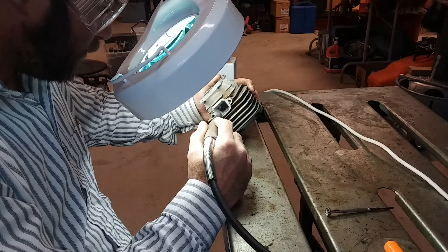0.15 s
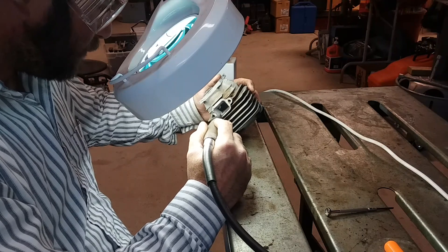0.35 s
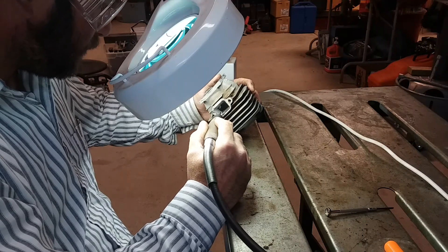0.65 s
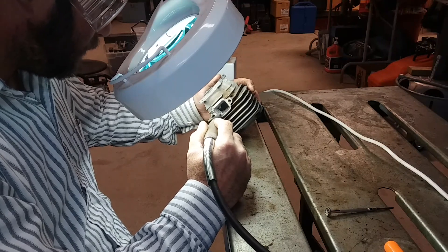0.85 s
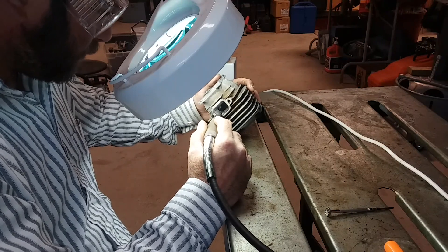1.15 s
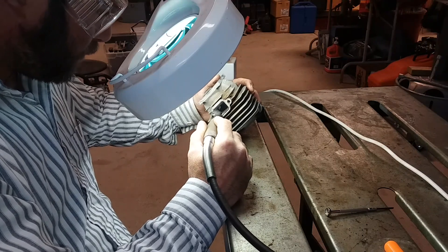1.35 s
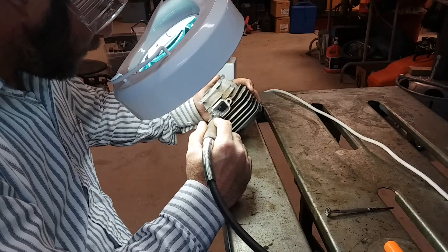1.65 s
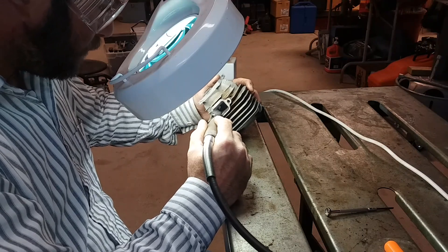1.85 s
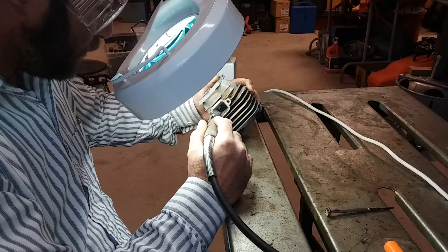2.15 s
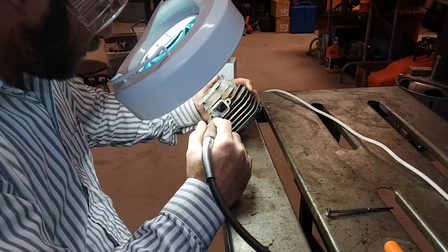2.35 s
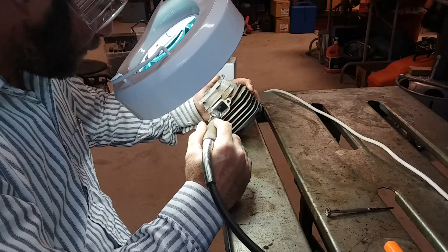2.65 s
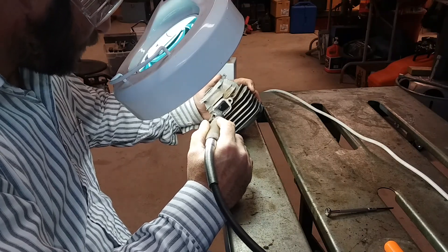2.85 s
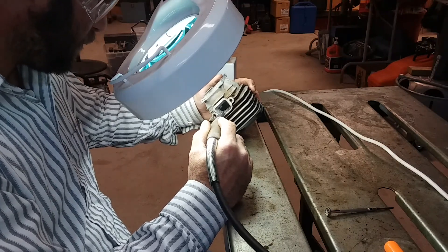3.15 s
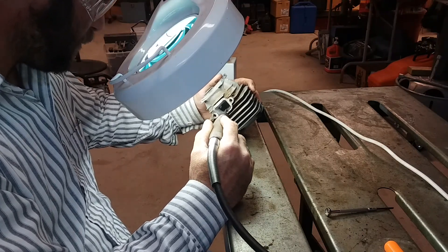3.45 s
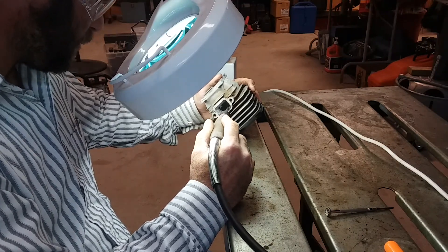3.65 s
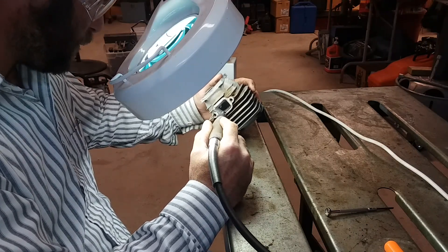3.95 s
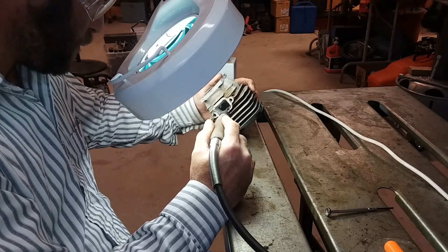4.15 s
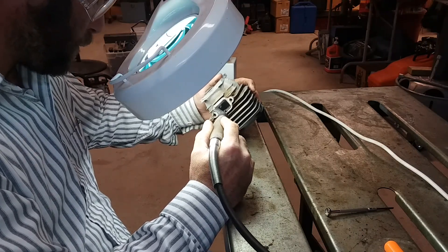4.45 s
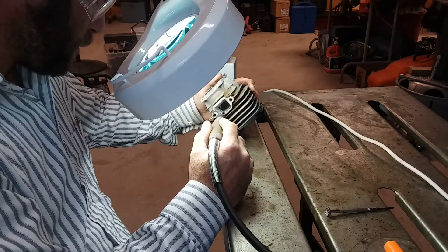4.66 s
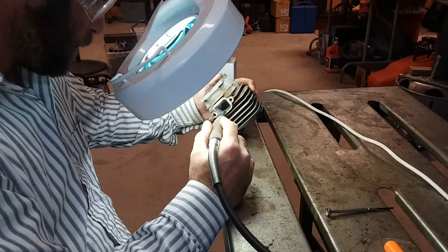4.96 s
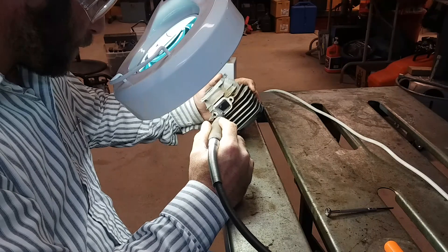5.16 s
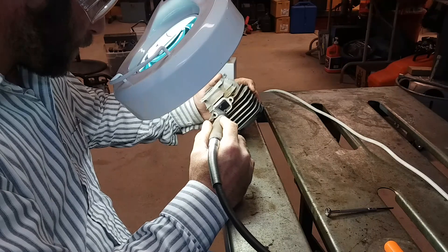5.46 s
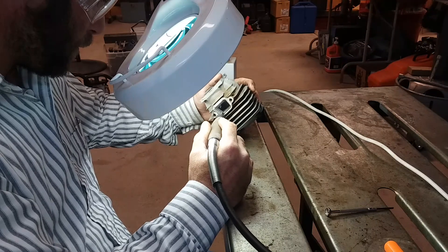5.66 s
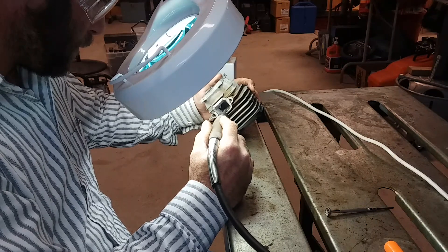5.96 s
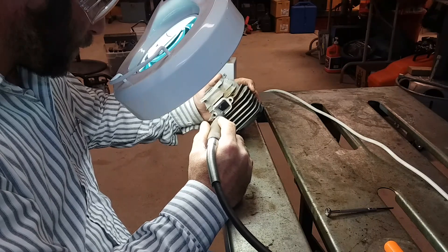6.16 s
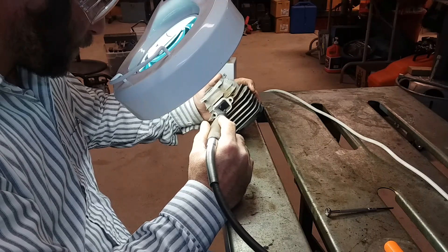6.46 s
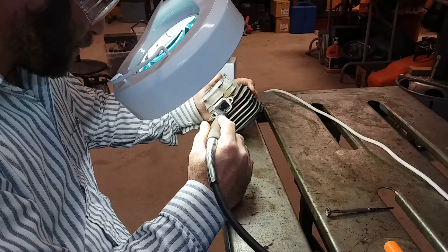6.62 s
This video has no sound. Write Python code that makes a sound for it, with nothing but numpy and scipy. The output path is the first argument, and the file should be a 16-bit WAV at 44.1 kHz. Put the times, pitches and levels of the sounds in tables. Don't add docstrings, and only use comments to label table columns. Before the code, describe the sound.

A rotary burr buzzes steadily against metal, its fast knocks merging into a coarse drone topped with sizzling hiss. Two short lifts and one longer lift thin the sound to airy motor whine; skittering taps mark the second and third returns. Then grinding resumes brighter, with wavering metallic ringing until the end. Heard close at a bench in a slightly live shop, in stereo.

```python
import sys
import numpy as np
from scipy import signal
from scipy.fft import rfft, irfft, next_fast_len
from scipy.io import wavfile
from scipy.ndimage import uniform_filter1d, map_coordinates

SR = 44100
rng = np.random.default_rng(int(sys.argv[2]) if len(sys.argv) > 2 else 0)


def materialize(psi):
    bounded = np.clip(np.atleast_2d(psi).T, -1, 1)
    quanta = np.round(bounded * 32767).astype(np.int16)
    wavfile.write(sys.argv[1], SR, quanta)


def invert_db(x):
    u = np.asarray(x, float) / 20
    return 10 ** u


N = 299439

# start_s, turns_per_s
SHAFT_SPEED = [(0, 168.5), (.3, 168.0), (.5, 169.0), (.75, 170.4), (1.0, 169.8), (1.35, 168.0),
               (1.55, 168.4), (1.75, 169.9), (2.0, 170.1), (2.3, 168.2), (2.55, 168.4), (2.8, 170.0),
               (3.3, 170.1), (3.7, 167.2), (3.95, 169.0), (4.3, 168.2), (6.79, 168.2)]
# start_s, end_s
LIFTS = [
    (.535, 0.86),
    (1.645, 1.974),
    (2.635, 3.245),
]
# start_s, knock_db, hiss_db, once_a_turn_shake_db, twice_a_turn_shake_db
HOLDS = [
    (0, -30, -42.5, -47, -52),
    (.29, -35.5, -42.5, -48.5, -60.5),
    (.7, -31, -44.5, -48.5, -67),
    (1.12, -33, -44.5, -47.5, -50),
    (1.8, -32.5, -43, -47, -53),
    (3.0, -41.5, -43, -49, -57),
    (3.64, -38.5, -40, -57.5, -62),
    (4.1, -37.5, -39, -49, -58),
    (4.95, -35, -38.5, -47.5, -57.5),
    (5.9, -34.5, -40, -46.5, -55),
]
# start_s, length_s, knock_gain_db, hiss_gain_db
DIGS = [(.1, 0.043, 0.5, 4), (.21, 0.078, -2, 3.5), (.45, 0.16, 5, 7), (.98, 0.16, -0.5, 3.5),
        (1.39, 0.11, 2, 3.5), (1.45, 0.076, 2, 5.5), (1.55, 0.051, 0, 5), (2.09, 0.04, 2.5, 8),
        (2.29, .06, 8, 6), (2.46, 0.058, 1, 4.5), (3.33, .08, 5, 4.5), (3.5, 0.099, 3.5, 3.5),
        (3.66, 0.045, -1.5, 1.5), (3.85, 0.061, 3.5, 1.5), (4.16, 0.16, 4, 0), (4.36, 0.13, 7, -0.5),
        (4.51, 0.047, 8.5, 2.5), (4.61, 0.028, 6, 5.5), (4.69, .1, 4, 2), (4.91, .09, 8, 1.5),
        (5.23, 0.18, 4, 2.5), (5.49, 0.15, 3.5, 1.5), (5.84, 0.028, 7, 2.5), (5.91, 0.043, 4.5, 1),
        (6.11, 0.033, 4, -0.5), (6.2, 0.12, 2, 1), (6.33, 0.087, 1.5, 2.5), (6.5, 0.038, 1, 4),
        (6.58, 0.066, 0.5, 5.5), (6.76, 0.049, 7, 3.5)]
# start_s, peak_db
TOUCHDOWNS = [(1.9522, -21.5), (1.9686, -20.5), (1.9817, -31), (1.9935, -35), (2.004, -32), (2.0158, -21),
              (2.028, -26), (2.0457, -26), (2.0573, -18), (3.203, -22.5), (3.2162, -29), (3.2513, -24),
              (3.264, -28), (3.275, -25), (3.28, -26), (3.2935, -33)]
# pitch_hz, width_hz, level_db
PORT_FIRST = [(1657, 166, 4.5), (1920, 980, -2), (2573, 140, 0), (3565, 380, -5.5)]
PORT_SECOND = [(1688, 230, -1), (2155, 710, -3), (2608, 340, -4.5), (3530, 206, -9)]
# pitch_hz, level_db (per Hz)
RASP = [(60, -52), (120, -16), (200, -21), (221, -8.5), (329, -8), (385, -13.5), (904, -19), (1430, -3),
        (1870, -7.5), (2860, -8), (4260, -2.5), (6000, -6), (7800, -43), (13200, -120)]
# pitch_hz, width_hz, level_db (over the rasp)
FINS_FIRST = [(1937, 16, 20), (2692, 30, 12), (3610, 150, 2), (4383, 14, 9), (4720, 110, 0)]
FINS_SECOND = [(1640, 22, 12), (2468, 30, 6), (2690, 25, 4), (3433, 90, -2), (3600, 25, 6), (3710, 25, 4),
               (3842, 16, 8), (4312, 16, 1)]
# pitch_hz, level_db (per Hz)
HISS_FIRST = [(1000, -55), (3240, -5), (5500, -4.5), (5820, -8), (7320, -2), (9600, -11.5), (13100, -2),
              (15700, -12.5)]
HISS_SECOND = [(1000, -50), (3240, -21), (5500, -17), (6190, -7), (7220, -3.5), (7750, -4), (8870, -9),
               (10000, -7), (10400, -9.5), (11600, -7), (13800, 0), (15700, -7)]
# pitch_hz, width_hz, level_db
WALLS_FIRST = [(7080, 60, 2), (7350, 100, 5), (8060, 80, 2), (11850, 140, 4), (13550, 100, 3),
               (15130, 60, 6)]
WALLS_SECOND = [(7050, 70, 4), (7350, 80, 10), (8075, 60, 2), (8580, 50, 10), (9050, 80, 8),
                (10490, 40, 10), (12320, 50, 4), (13360, 40, 8), (14090, 120, 4), (14357, 35, 8),
                (15140, 90, 13), (15353, 40, 6), (15680, 60, 3)]
# pitch_hz, width_hz, level_db (of the cancelling wave)
NULLS = [(5900, 250, -6), (6350, 150, -6), (8440, 120, -3), (9160, 150, -3), (9900, 500, -6),
         (10350, 150, -4), (14780, 350, -4)]
# pitch_hz, left_right_likeness (0 to 1)
DIRECT = [(150, 0.99), (500, 0.84), (1000, 0.34), (1800, 0.99), (2800, 0.63), (6000, 0.66), (15000, 0.67)]
# pitch_hz, level_db
LEAN = [(60, 9), (150, -1), (380, 0.5), (950, 10), (2380, 0.5), (5980, 2.5), (15000, 3)]
# pitch_hz, t60_s
SHOP_DECAY = [(200, 0.95), (2000, 0.25), (12000, 0.058)]
# start_s, level_db
HUM = [(0, -56), (1.55, -56.5), (2.55, -60), (2.8, -63.5), (4.2, -64.5), (6.79, -69)]
# pitch_hz, level_db (per Hz)
BOARDS = [(120, -49), (230, -1), (330, -9), (450, 5.5), (800, -13), (1300, -30), (3000, -80)]
# pitch_hz, level_db (per Hz)
MOTOR_RUSH = [(30, -28), (65, -16), (105, -11), (165, -23), (250, -17), (500, -11), (1150, -4), (1450, -9),
              (2200, -8), (3200, -11), (5500, -16), (8100, -17), (8500, -22), (10500, -21), (13500, -18),
              (15800, -17)]
# pitch_hz, width_hz, level_db (over the rush)
HOUSING = [(1660, 290, -4), (2600, 500, -3), (12000, 1050, -2.5)]
# pitch_hz, left_right_likeness (0 to 1)
FAR = [(150, 0.84), (500, 0.67), (1000, 0.054), (2000, 0.33), (15000, 0.56)]
# multiple_of_shaft_speed, level_db
SHAFT_TONES = [(10, -60), (14, -63), (16, -55.5), (18, -53), (22, -66), (32, -67), (33, -70), (48, -63),
               (76, -71)]
SINGING_HZ = [4011, 4151, 4386, 4506]
# start_s, length_s, swell_db
SINGING_SWELLS = [
    [(3.4, 0.27, 15), (3.75, .25, 11), (4.05, 0.24, 14.5), (4.48, .16, 11), (4.67, .14, 12),
     (5.12, .25, 10.5), (6.25, .5, 7)],
    [(3.55, 0.5, 5), (3.92, 0.18, 5), (4.15, .2, 5), (4.65, 0.27, 17), (5.13, .14, 16), (5.4, .2, 8),
     (5.67, .08, 6), (6.05, .3, 7)],
    [(3.45, 0.43, 8), (4.36, 0.078, 12), (4.56, .18, 13), (4.76, 0.11, 13), (5.13, .12, 13), (5.7, .35, 18),
     (6.18, .18, 14), (6.55, .2, 11)],
    [(4.35, .15, 3), (4.57, .15, 7), (5.35, 0.26, 8), (5.72, .35, 11), (6.12, 0.26, 6.5), (6.55, .3, -2)],
]

MOVE_S = 3.0
SHIFT_S = 0.059
LIFT_DB, EASE_OFF_S, EASE_ON_S = 11, 0.06, 0.1
RING_OVER_HISS_DB = (2.5, 0)
RING_DIG_SHARE = 0.25
SHAKE_LIFT_DB, SHAKE_LAG_S, SHAKE_LEAD_S = 34, 0.18, 0.047
SHAKE_OFF_S, SHAKE_ON_S = 0.34, 0.23
BEAT_S, BEAT_PEAK_S, BEAT_DEPTH = 0.1575, 0.076, 0.38
MOTOR_DB = -42
LOAD_DB = 7.5
SING_REST_DB = -60.5
MIC_HZ = 50
TOP_HZ = 15710

SECONDS = np.arange(N) / SR
AT_SECOND_SPOT = np.arange(N) > MOVE_S * SR
SIDES = np.array([[0.5], [-0.5]])


def unit(x):
    return x / np.sqrt(np.mean(x ** 2) + 1e-20)


def along(points, hz):
    f, v = np.transpose(points)
    return np.interp(np.log(hz + 1), np.log(f + 1), v)


def automation(rows):
    s, value = np.transpose(rows)
    return np.interp(SECONDS, s, value)


def wobble(rate):
    knots = rng.standard_normal(int(N * rate / SR) + 4)
    return map_coordinates(knots, [np.arange(N) * rate / SR])


def filtered(x, response):
    m = next_fast_len(N + SR // 2)
    hz = np.fft.rfftfreq(m, 1 / SR)
    return irfft(rfft(x, m) * response(hz), m)[..., :N]


def modes(table, flip=-1):
    def response(f):
        total = 0
        for k, (center, width, db) in enumerate(table):
            loss = 1j * f * width
            total = total + flip ** k * invert_db(db) * loss / (center * center - f * f + loss)
        return total
    return response


def body(broad, table):
    return lambda f: invert_db(along(broad, f)) * (1 + modes(table, flip=1)(f))


def by_spot(drive, first, second):
    return np.where(AT_SECOND_SPOT, unit(filtered(drive, second)), unit(filtered(drive, first)))


def swells(rows):
    total = 0
    for s, long, *db in rows:
        quarter_turns = np.clip((SECONDS - s) / long / 2, -0.5, 0.5)
        total = total + np.outer(db, np.cos(np.pi * quarter_turns) ** 2)
    return total


def held():
    rows = np.array(HOLDS)
    steps = rows[np.searchsorted(rows[1:, 0], SECONDS), 1:].T
    return uniform_filter1d(steps, size=int(SHIFT_S * SR), axis=1)


def lifted(off_s, on_s, lag_s=0, lead_s=0):
    total = 0
    for start, end in LIFTS:
        leaving = (SECONDS - start - lag_s) / off_s + 1
        returning = (end - lead_s - SECONDS) / on_s + 1
        total = total + np.clip(np.minimum(leaving, returning), 0, 1)
    return total


def contact():
    off = sum((SECONDS > start) & (SECONDS < end) for start, end in LIFTS)
    return 1 - 0.9 * uniform_filter1d(off.astype(float), size=900)


def bite():
    knock_db, hiss_db = held()[:2] - LIFT_DB * lifted(EASE_OFF_S, EASE_ON_S)
    knock_dig, hiss_dig = swells(DIGS)
    over_db = np.where(AT_SECOND_SPOT, RING_OVER_HISS_DB[1], RING_OVER_HISS_DB[0])
    ring_db = hiss_db + over_db + RING_DIG_SHARE * knock_dig
    return knock_db + knock_dig, ring_db, hiss_db + hiss_dig


def knocks(turns, jitter_s, scatter_db):
    at = np.flatnonzero(np.diff(np.floor(turns)))
    luck = rng.standard_normal((len(at), 2))
    late = np.round(luck[:, 0] * jitter_s * SR).astype(int)
    return np.bincount(np.clip(at + late, 0, N - 1), invert_db(scatter_db * luck[:, 1]), N)


def scrape(turns, depth_db, grit_db, channels=1):
    noise = rng.standard_normal((channels, N)).squeeze()
    return unit(noise * invert_db(-depth_db * (turns % 1) + grit_db * wobble(300)))


def cavity(table):
    return lambda f: modes(table)(f) * (1j * f / (1300 + 1j * f)) ** 2


def port(turns, blows, pressure):
    chips = scrape(turns, depth_db=8, grit_db=2.5)
    return by_spot(pressure * (blows + 0.24 * chips), cavity(PORT_FIRST), cavity(PORT_SECOND))


def fins(turns, blows, pressure, ring_db):
    rub = 0.3 * blows + scrape(turns, depth_db=7, grit_db=2.5)
    drive = pressure * invert_db(ring_db + 42) * rub
    return by_spot(drive, body(RASP, FINS_FIRST), body(RASP, FINS_SECOND))


def hiss(turns, blows, pressure):
    own = scrape(turns, depth_db=5, grit_db=2.2, channels=2)
    shared = 0.3 * blows + 1.05 * scrape(turns, depth_db=7, grit_db=2.2)
    drive = pressure * (own + np.array([np.roll(shared, -1), shared]))
    walls = body(HISS_SECOND, WALLS_SECOND)
    second = lambda f: walls(f) * (1 - modes(NULLS, flip=1)(f))
    return by_spot(drive, body(HISS_FIRST, WALLS_FIRST), second) * invert_db([[0.4], [-0.4]])


def touchdowns():
    taps = np.zeros(N)
    for s, db in TOUCHDOWNS:
        taps[round(s * SR)] = invert_db(db + 29)
    return filtered(taps, cavity(PORT_FIRST))


def echoes(x):
    step = SR // 4
    out = np.zeros((2, N + 2 * SR))
    padded = np.pad(x, (step, 2 * step))
    window = np.sin(np.pi * np.arange(2 * step) / (2 * step))
    for start in range(-step, N, step):
        hz, t, z = signal.stft(rng.standard_normal((2, SR // 4)), SR, nperseg=256)
        fade = invert_db(-60 * t / along(SHOP_DECAY, hz)[:, None])
        fade = fade / np.linalg.norm(fade, axis=1, keepdims=True)
        tail = signal.istft(z * fade, SR, nperseg=256)[1]
        piece = padded[start + step:][:2 * step]
        wet = signal.fftconvolve((piece * window)[None], tail / np.linalg.norm(tail[0]), axes=1)
        out[:, start + step + 130:][:, :wet.shape[1]] += wet
    return out[:, step:step + N]


def shop(x, lead_s):
    share = lambda f: np.clip(along(DIRECT, f), 0, 1)
    direct = filtered(x, lambda f: np.sqrt(share(f)) * np.exp(2j * np.pi * f * lead_s * SIDES))
    both = direct + filtered(echoes(x), lambda f: np.sqrt(1 - share(f)))
    return filtered(both, lambda f: invert_db(along(LEAN, f) * SIDES))


def burr(turns):
    knock_db, ring_db, hiss_db = bite()
    tremor = wobble(30)
    press = lambda shared_db, own_db: invert_db(shared_db * tremor + own_db * wobble(16))
    blows = unit(knocks(turns, jitter_s=0.000065, scatter_db=2.8))
    knocking = invert_db(knock_db - 1.5) * port(turns, blows, press(1.4, 1))
    ringing = invert_db(-38.0) * fins(turns, blows, press(1.3, 1.1), ring_db)
    near = contact() * (knocking + ringing) + touchdowns()
    hissing = invert_db(hiss_db + 2.5) * hiss(turns, blows, press(0.78, 0.99))
    return shop(near, lead_s=0.00006) + contact() * hissing


def bench(turns):
    settle_db = SHAKE_LIFT_DB * lifted(SHAKE_OFF_S, SHAKE_ON_S, SHAKE_LAG_S, SHAKE_LEAD_S) ** 2
    once_db, twice_db = held()[2:]
    once_db = once_db - settle_db
    twice_db = twice_db - 0.55 * settle_db
    throb = 1 + BEAT_DEPTH * np.cos(2 * np.pi * (SECONDS - BEAT_PEAK_S) / BEAT_S)
    once = invert_db(once_db + 2.5 + 1.4 * wobble(7)) * np.sin(2 * np.pi * turns + 0.13 * wobble(60))
    twice = invert_db(twice_db + 1.0 + 2.9 * wobble(14)) * throb * np.sin(4 * np.pi * turns + 0.5 * wobble(25))
    thrice = invert_db(twice_db - 9 + 3 * wobble(7)) * np.sin(6 * np.pi * turns + 0.4 * wobble(25))
    boards = filtered(rng.standard_normal(N), lambda f: invert_db(along(BOARDS, f)))
    rattle = invert_db(once_db - 13) * unit(boards)
    hum = invert_db(automation(HUM) + 2 + 1.5 * wobble(5)) * np.sin(2 * np.pi * 120 * SECONDS)
    return (once + twice + thrice + rattle + hum) * invert_db([[1.1], [-1.1]])


def motor(turns):
    pair = rng.standard_normal((2, N)) * invert_db(0.7 * wobble(9))
    spread = lambda hz: np.arccos(np.clip(along(FAR, hz), -1, 1)) / 2
    case = body(MOTOR_RUSH, HOUSING)
    mid, side = filtered(pair, lambda hz: case(hz) * np.array([np.cos(spread(hz)), np.sin(spread(hz))]))
    rush = invert_db(MOTOR_DB + 0.8) * unit(np.array([mid + side, mid - side]))
    load_db = LOAD_DB * (lifted(0.12, 0.16, 0.03) - 1)
    whine = np.zeros((2, N))
    for k, db in SHAFT_TONES:
        for ear in range(2):
            level = invert_db(db + load_db + 4 + 0.9 * wobble(5))
            whine[ear] += level * np.sin(2 * np.pi * k * turns + 0.3 * wobble(6))
    return rush + whine


def singing():
    out = np.zeros((2, N))
    for hz, rows in zip(SINGING_HZ, SINGING_SWELLS):
        db = SING_REST_DB + swells(rows)[0] - LIFT_DB * lifted(EASE_OFF_S, EASE_ON_S)
        phase = 2 * np.pi * hz * SECONDS + 0.7 * wobble(12)
        apart = SIDES * (1.1 + 0.35 * wobble(3.1))
        out += invert_db(db + 6 + 1.3 * wobble(25)) * np.sin(phase + apart)
    return out * (SECONDS > MOVE_S)


def scene():
    turns = np.cumsum(automation(SHAFT_SPEED)) / SR
    return burr(turns) + bench(turns) + motor(turns) + singing()


def low_pass(x):
    return signal.sosfilt(signal.butter(12, 16140, fs=SR, output="sos"), x)


def record(dry):
    rumble = filtered(rng.standard_normal(dry.shape), lambda f: invert_db(-49) / (1 + (f / 90) ** 4))
    edge = lambda f: invert_db(-0.3 * np.clip(f - TOP_HZ, 0, 250))
    bass = lambda f: (1j * f / (MIC_HZ + 1j * f)) ** 2
    mix = filtered(dry + rumble, lambda f: edge(f) * bass(f))
    return low_pass(mix)


dry = scene()
out = record(dry)
materialize(out)
```